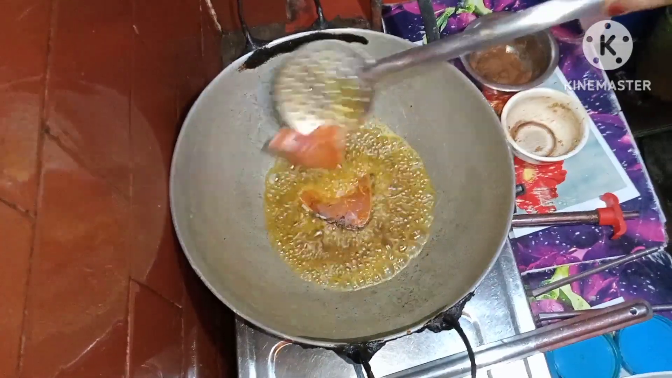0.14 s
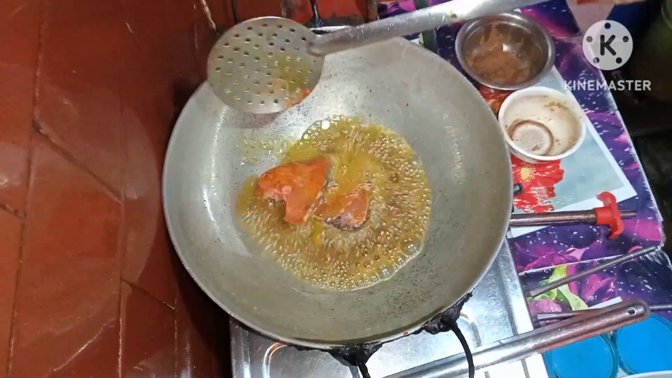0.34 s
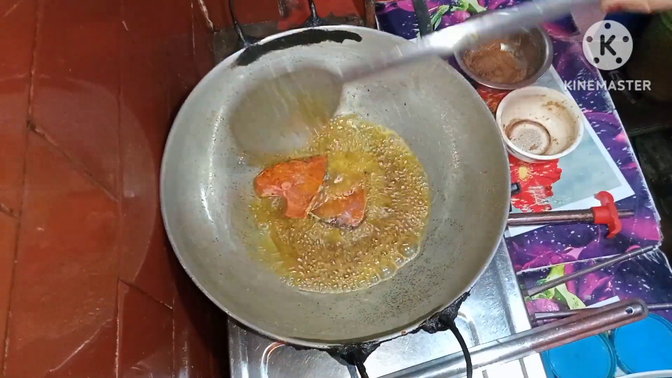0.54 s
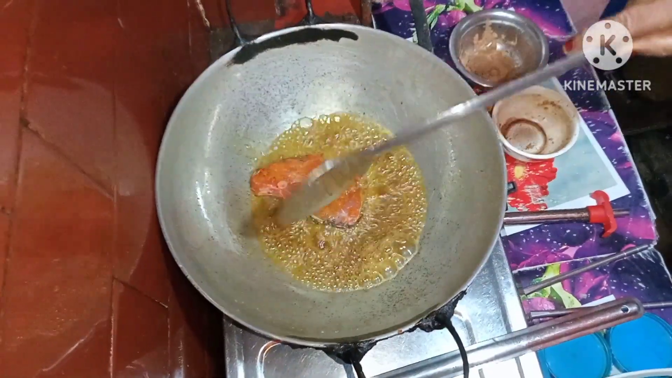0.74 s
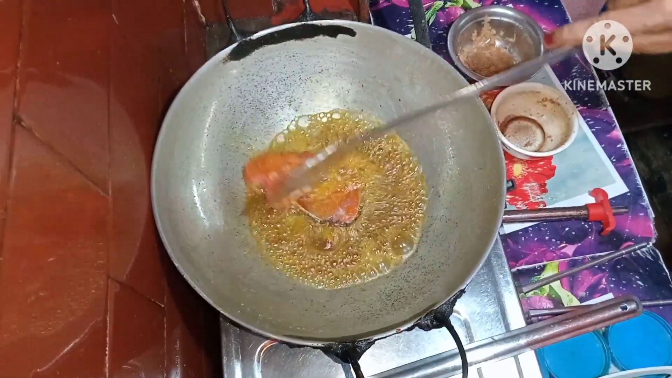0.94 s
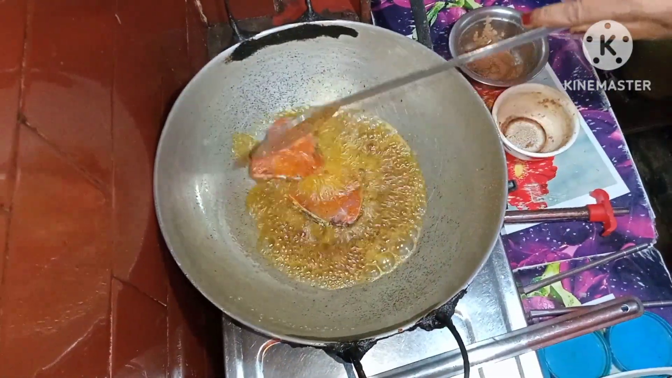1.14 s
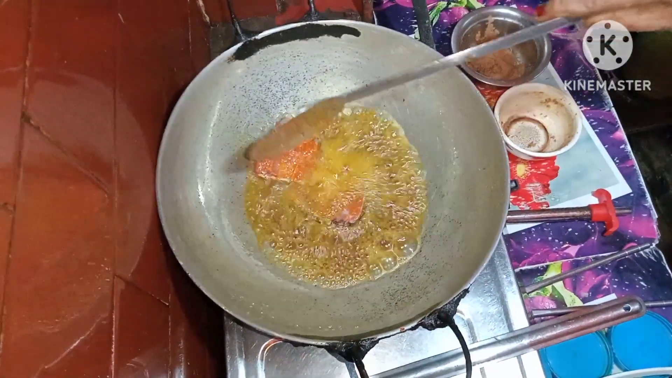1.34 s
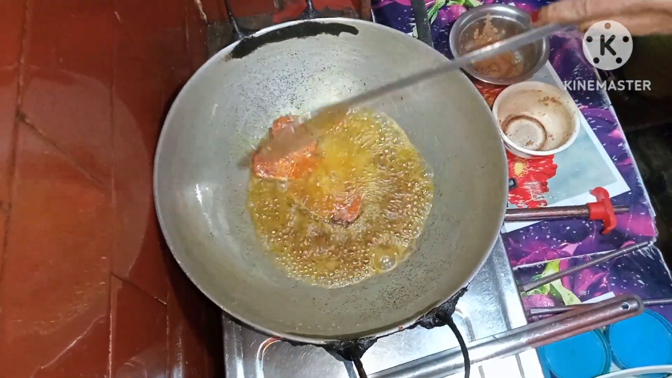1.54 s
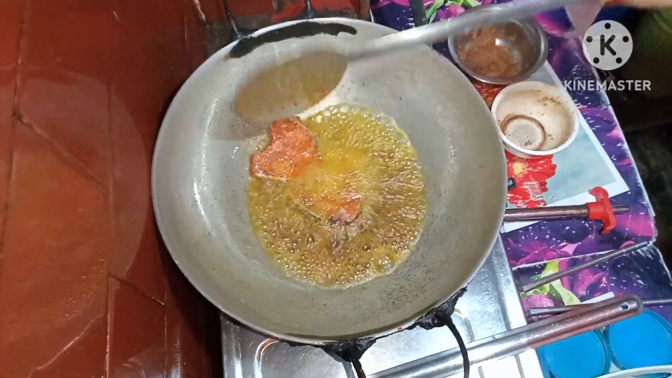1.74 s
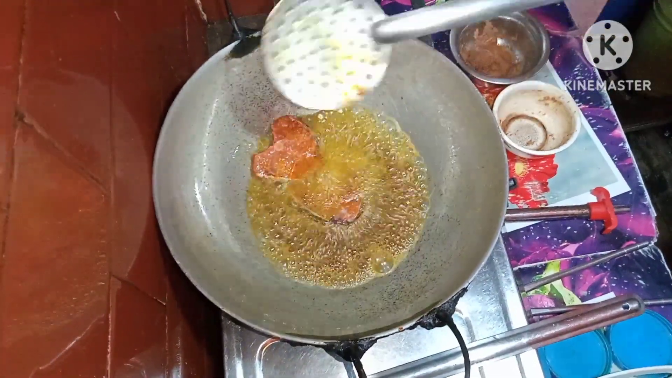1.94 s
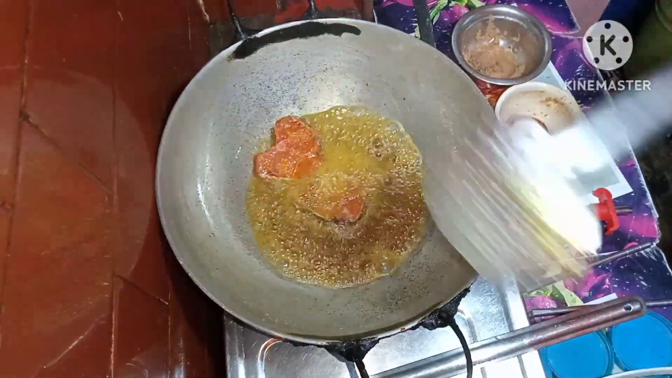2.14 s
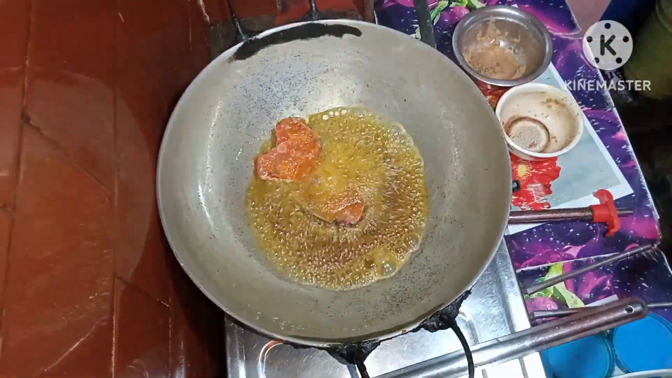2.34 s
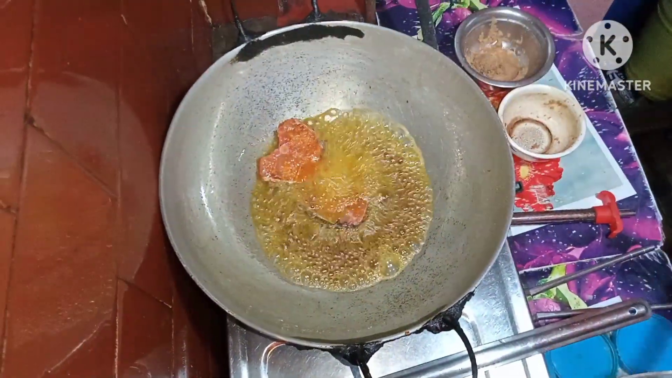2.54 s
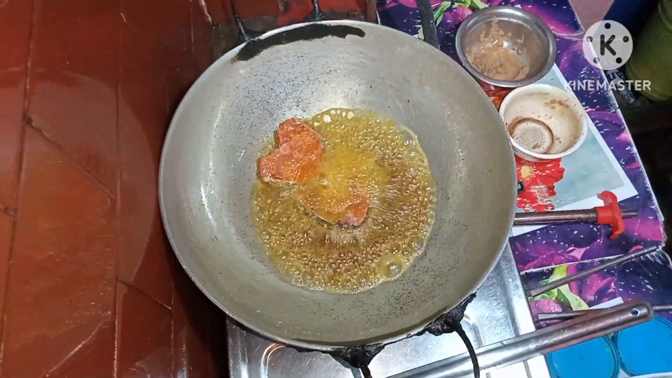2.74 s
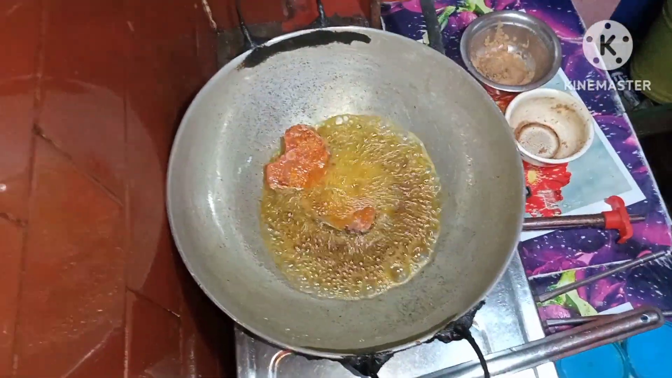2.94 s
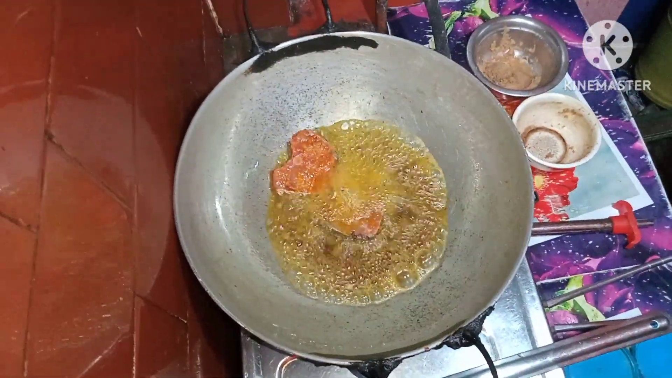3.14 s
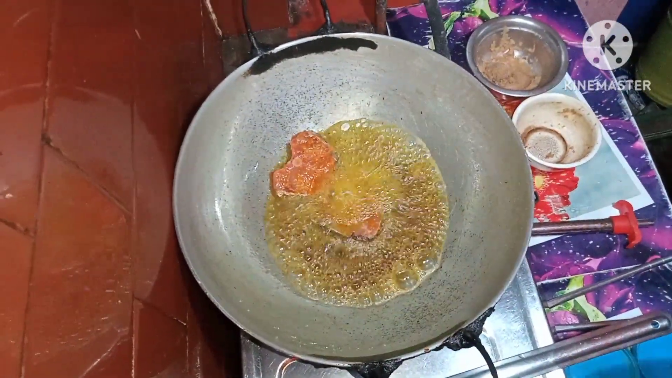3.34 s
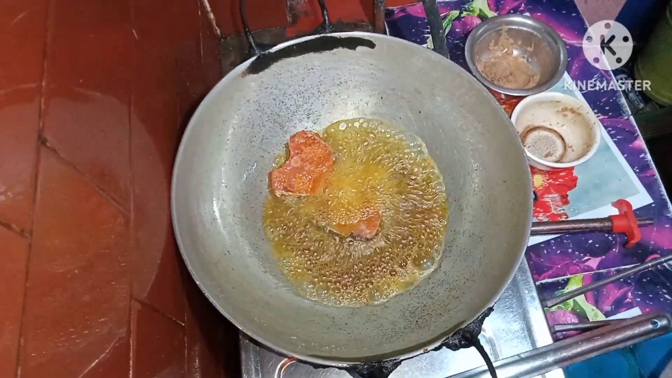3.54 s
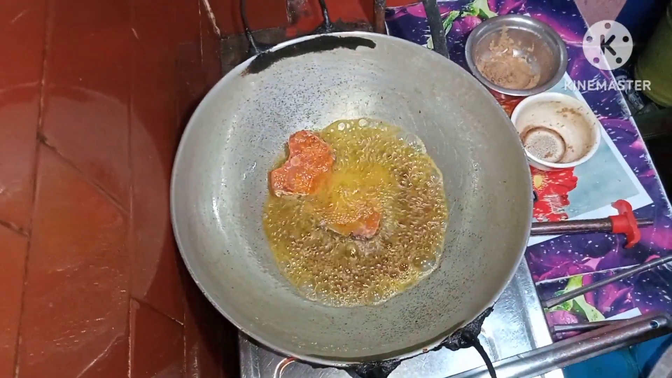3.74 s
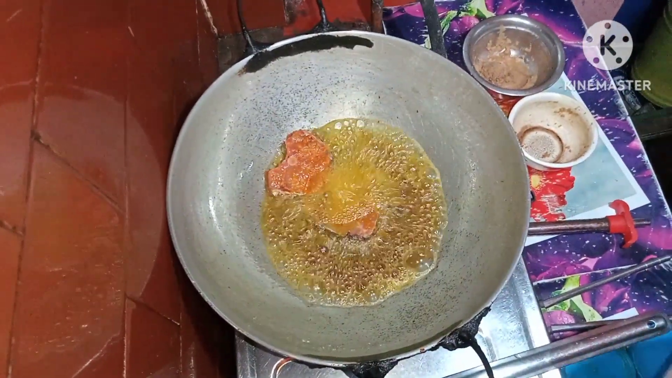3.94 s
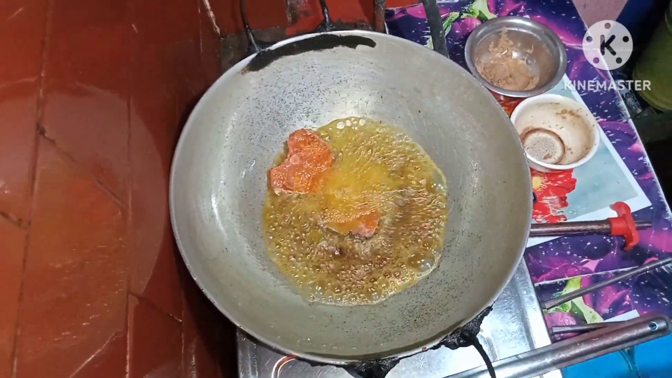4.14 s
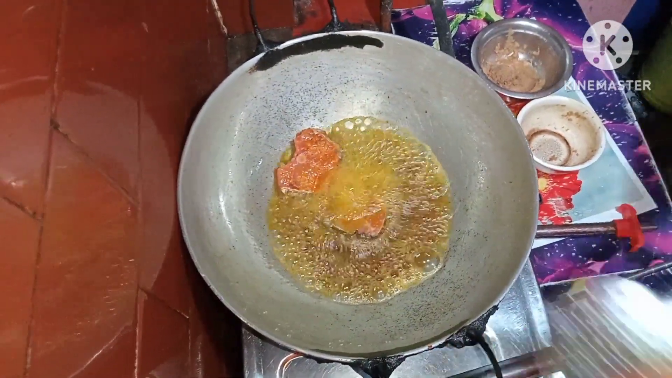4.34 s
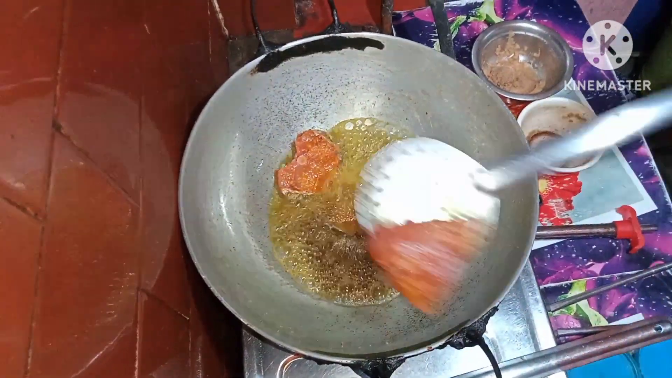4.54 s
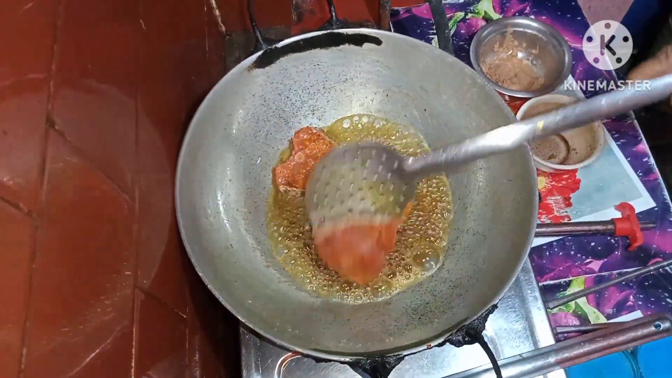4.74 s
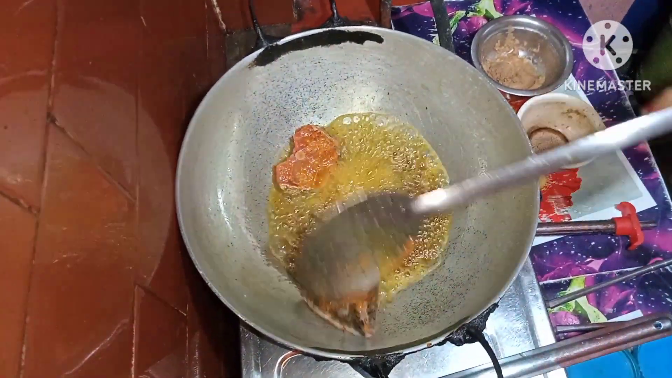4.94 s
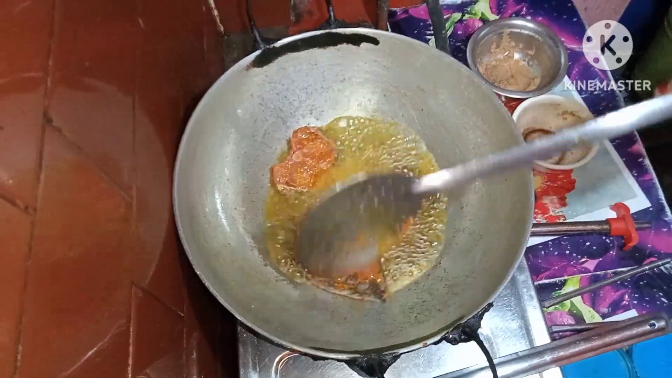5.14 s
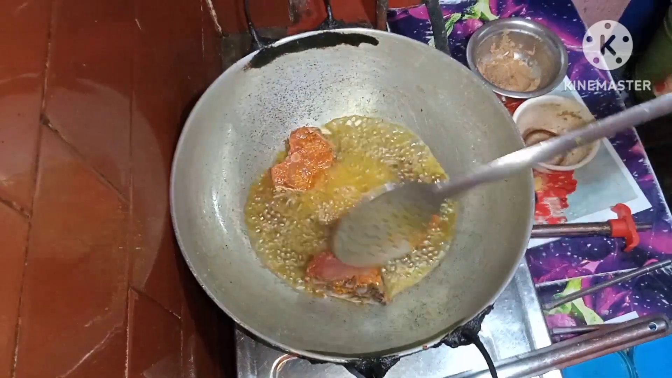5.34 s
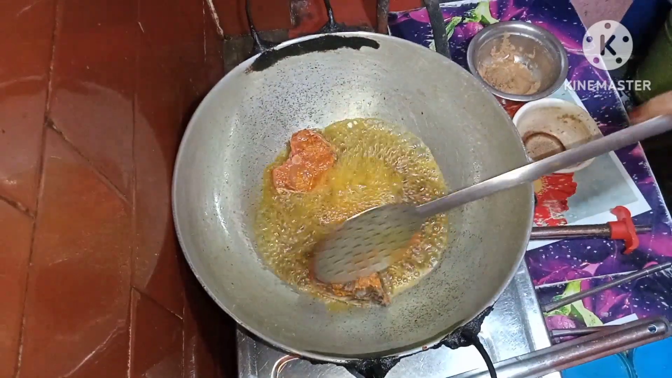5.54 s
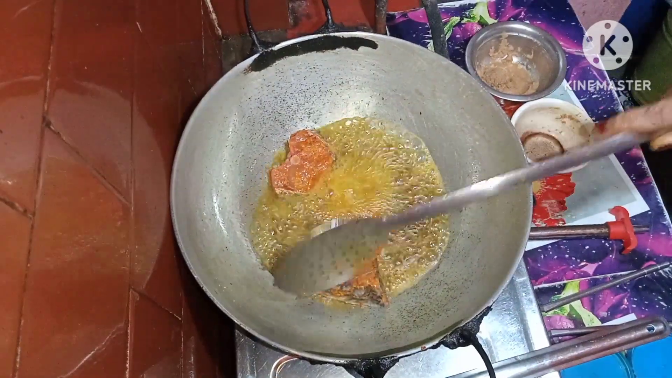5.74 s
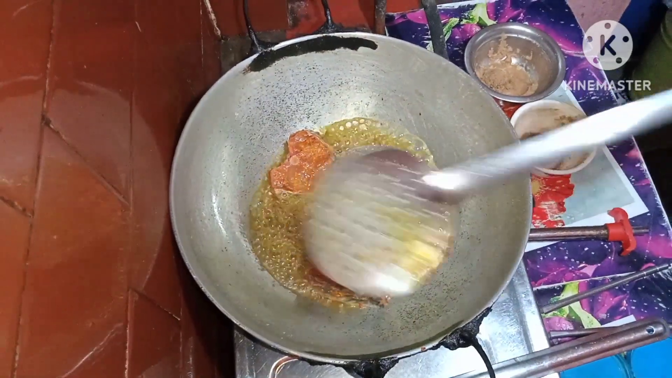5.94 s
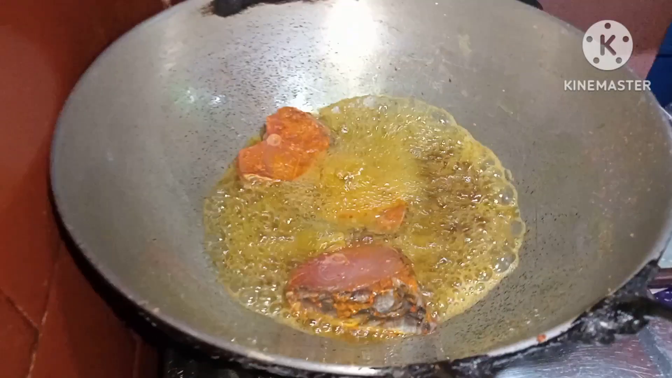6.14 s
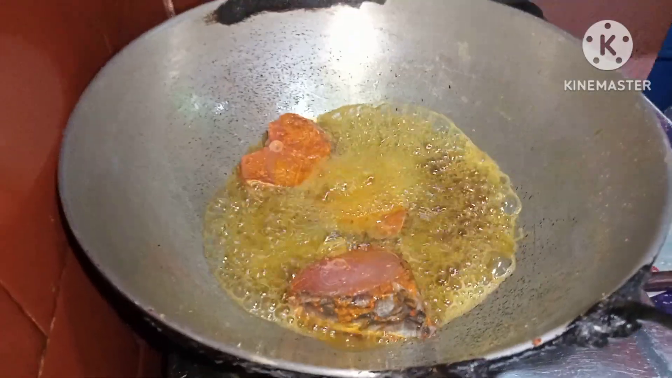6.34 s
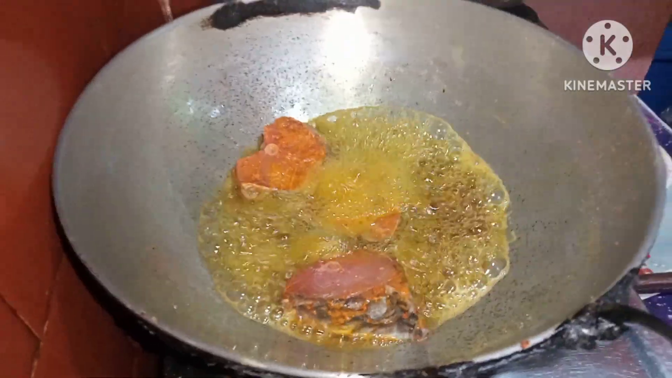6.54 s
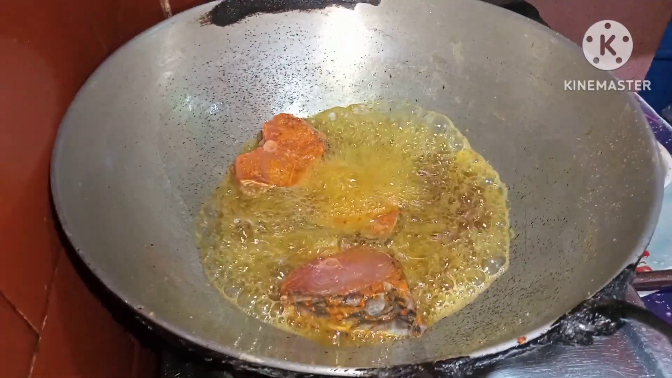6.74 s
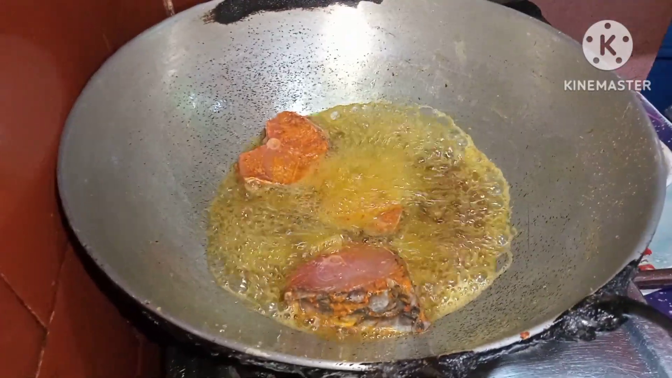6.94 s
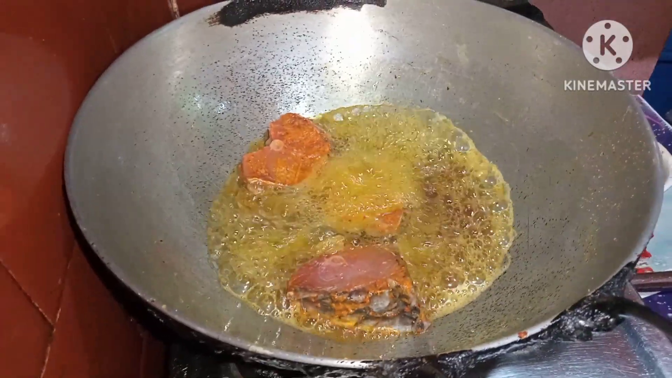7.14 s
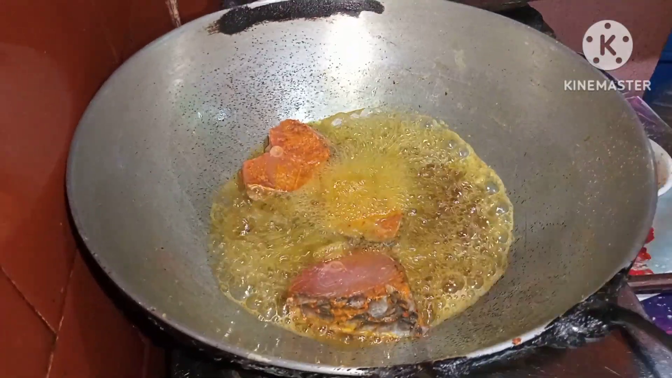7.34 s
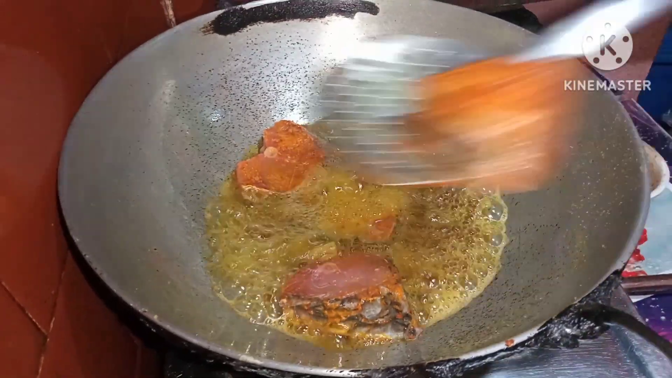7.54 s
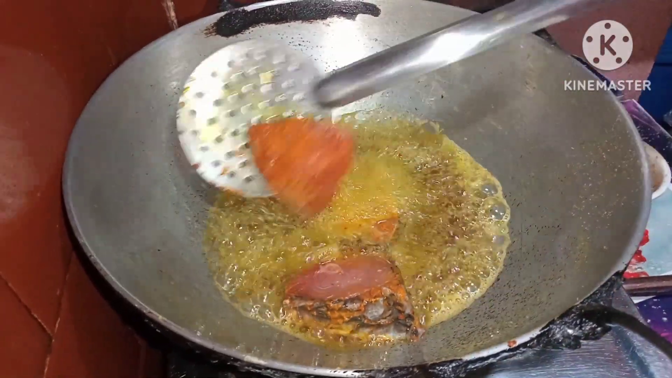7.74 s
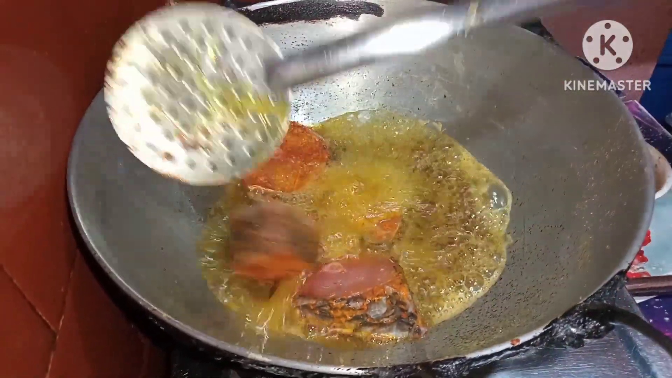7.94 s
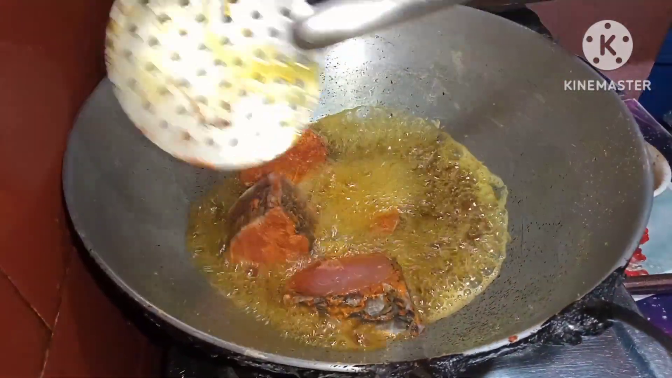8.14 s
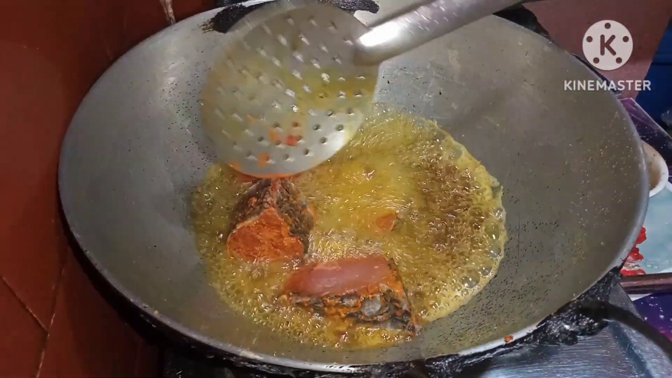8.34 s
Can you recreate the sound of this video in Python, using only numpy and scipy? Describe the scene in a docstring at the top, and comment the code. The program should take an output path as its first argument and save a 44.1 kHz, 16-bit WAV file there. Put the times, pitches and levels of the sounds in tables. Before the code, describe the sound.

Fish sizzles and pops in hot oil, surging as pieces go in, with a brief ladle scrape and one sharp click.

```python
"""A close, bright sizzle with sharp pops: fish frying in a metal wok in a small kitchen. Steam bubbles burst in
three sizes, surging as wet pieces meet the oil; water drops pop and spit, and a ladle scrapes the metal. Off to
the side the ladle knocks and scrapes in a tub as it picks up the next piece, one sharp click sounds nearby, and
a motor hums faintly. The microphone is above the wok; at about six seconds the sound crossfades to a duller
sizzle, heard from beside the rim."""
import sys
import numpy as np
from scipy import signal
from scipy.io import wavfile
from scipy.ndimage import uniform_filter1d, minimum_filter1d

SR = 44100
rng = np.random.default_rng(int(sys.argv[2]) if len(sys.argv) > 2 else 0)


def unload_audio(sound):
    """Save the sound as a 16-bit wav file, at the path given as the first command line argument."""
    columns = np.transpose(np.atleast_2d(sound))
    # keep every value between -1 and 1, then stretch to whole-number steps
    steps = np.round(np.clip(columns, -1, 1) * 32767)
    wavfile.write(sys.argv[1], SR, steps.astype(np.int16))


N = 374409
T = np.arange(N) / SR


def amp(db):
    """Decibels to gain."""
    return 10 ** (np.asarray(db) / 20)


def unit_rms(x):
    """Scales to an rms of one."""
    return x / np.sqrt(np.mean(x ** 2) + 1e-20)


def add(mix, start_s, sound):
    """Mixes a sound in at start_s."""
    part = mix[max(round(start_s * SR), 0):][:len(sound)]
    part += sound[:len(part)]


def wander(per_s):
    """A random curve of about unit size, with per_s turns a second."""
    knots = rng.standard_normal(2048)
    return np.interp(T * per_s, np.arange(len(knots)), knots)


def at_freq(points, hz):
    """Reads a table on a log-frequency axis."""
    freqs, values = np.transpose(points)
    return np.interp(np.log(hz + 1), np.log(freqs + 1), values)


def colour(x, points, size=4096):
    """Causal filter with the given spectrum, falling steeply past its last point."""
    hz = abs(np.fft.fftfreq(size, 1 / SR))
    db = at_freq(points, hz) - 60 * np.log2(np.maximum(hz / points[-1][0], 1))
    log_gain = np.log(amp(np.maximum(db, -100)))
    taps = np.fft.ifft(np.exp(np.conj(signal.hilbert(log_gain)))).real  # minimum phase
    return signal.oaconvolve(x, taps)[:len(x)]


def low_cut(x, hz):
    """Removes the bass below hz."""
    return signal.sosfilt(signal.butter(3, hz, "high", fs=SR, output="sos"), x)


def resonate(x, modes):
    """Drives resonances with x, each to its own rms level."""
    out = np.zeros(len(x))
    for hz, width_hz, db in modes:
        pole = np.exp((2j * np.pi * hz - np.pi * width_hz) / SR)
        out += amp(db) * unit_rms(signal.lfilter([1], [1, -pole], x).real)
    return out


def struck_mode(t, hz, db, t60_s):
    """One mode of a struck object: a sine that falls 60 dB in t60_s."""
    return amp(db) * np.exp(-np.log(1000) * t / t60_s) * np.sin(2 * np.pi * hz * t)


def burst(hz, cycles):
    """One bursting bubble: a ring that peaks after `cycles` turns and dies quickly."""
    turns = hz * np.arange(2048) / SR
    return turns / cycles * np.exp(1 - turns / cycles) * np.sin(2 * np.pi * turns)


def froth(noise, hz, cycles):
    """Noise rung through a bubble: a dense cluster of bursts around one pitch."""
    return unit_rms(signal.fftconvolve(noise, burst(hz, cycles))[:len(noise)])


def rim_share(midway_s=6.05, crossfade_s=0.21):
    """Crossfade between two listening places: 0 above the wok, 1 beside its rim."""
    return np.clip((T - midway_s) / crossfade_s + .5, 0, 1)


# Reverberation of the small kitchen: freq_hz, t60_s
KITCHEN_DECAY = [(150, 0.39), (700, 0.19), (2500, 0.1), (7000, 0.07), (15000, 0.14)]

def kitchen(x, wet_db):
    """Direct sound plus dense reflections from walls close to the microphone."""
    hz, t, spectrum = signal.stft(rng.standard_normal(SR // 2), SR, nperseg=256)
    decay = amp(-60 * t / at_freq(KITCHEN_DECAY, hz)[:, None])
    tail = signal.istft(spectrum * decay, SR, nperseg=256)[1]
    tail[:SR // 250] = 0  # the first reflection arrives after 4 ms
    return x + amp(wet_db) * signal.oaconvolve(x, tail / np.linalg.norm(tail))[:len(x)]


def motor_hum(mains_hz=99.93, motor_hz=98.37, in_step_s=0.41, mains_db=-73, motor_db=-64.5):
    """In the background a motor turns a little slower than the mains hum, so the two beat."""
    mains, motor = (np.sqrt(2) * np.cos(2 * np.pi * hz * (T - in_step_s)) for hz in (mains_hz, motor_hz))
    hum = amp(mains_db) * mains + amp(motor_db) * motor
    return hum * amp(1.2 * wander(13) + 2 * rim_share())  # wavers; louder at the rim


# Spectrum of the stove under the wok: freq_hz, level_db
STOVE_SPECTRUM = [(20, 7), (45, -12), (80, 18.5), (130, 16.5), (220, 6), (400, -25)]

def stove_rumble(level_db=-70):
    """The stove gives a low, steady rumble."""
    return amp(level_db) * unit_rms(colour(rng.standard_normal(N), STOVE_SPECTRUM))


# Spectrum of the ladle's scrape in the tub: freq_hz, level_db
SLIDE_SPECTRUM = [(150, -24.5), (225, -11), (265, 11), (315, -14.5), (410, 3), (540, -34), (740, 7),
                  (1080, 5), (1400, -12), (2200, -21)]

def tub_scrape(start_s=3.4, fastest_s=3.64, end_s=3.8, level_db=-35.5, ends_db=-16, judder_db=4.5):
    """The ladle is pushed through the tub with a juddering scrape that swells and stops."""
    swell_db = np.interp(T, [start_s, fastest_s, end_s], [ends_db, 0, ends_db])
    gain = amp(level_db + swell_db) * (T > start_s) * (T < end_s)
    friction = rng.standard_normal(N) * amp(judder_db * wander(90))
    return gain * unit_rms(colour(friction, SLIDE_SPECTRUM))


# Dull knocks of the ladle in the tub: start_s, level_db, pitch_hz
KNOCKS = [(2.48, -14, 731), (2.607, -10, 880), (2.643, -16.5, 880), (2.799, -16.5, 770), (2.86, -20, 725),
          (2.885, -17.5, 756), (2.898, -22, 733), (3.579, -21, 1170), (3.714, -25, 1010)]
# Dull, hollow ring of the knocks: pitch_hz, level_db, t60_s
KNOCK_MODES = [(236, -18.5, 0.066), (396, -17.5, 0.077), (750, -12.5, 0.078), (1036, -9, 0.075),
               (1262, -10.5, 0.073)]

def knocks(t60_s=0.046, bounce_s=0.0098, bounce_db=-6, attack_s=0.0059, contacts=3):
    """The ladle knocks in the tub and chatters to rest, each contact ringing differently."""
    out, t = np.zeros(N), np.arange(SR // 4) / SR
    soft_attack = 1 - np.exp(-t / attack_s)
    for start_s, level_db, pitch_hz in KNOCKS:
        modes = KNOCK_MODES + [(pitch_hz, 0, t60_s)]
        for bounce in range(contacts):
            ring = sum(struck_mode(t, hz * rng.uniform(0.94, 1.05), db, t60) for hz, db, t60 in modes)
            add(out, start_s, amp(level_db + bounce * bounce_db) * ring * soft_attack)
            start_s += bounce_s * rng.uniform(0.633, 1.4)
    return amp(-0.5) * kitchen(low_cut(out, 170), wet_db=-15)


# Hollow ring of the nearby click: pitch_hz, level_db, t60_s
CLICK_MODES = [(290, -20, 0.11), (413, -12, 0.067), (566, 1, 0.11), (900, -7, 0.13), (1260, -5.5, 0.19),
               (1810, -7, .16), (1816, 5, 0.074), (2030, -4, 0.13), (2450, -8, 0.081), (3200, -18, 0.14)]
# Spectrum of its rattle: freq_hz, level_db
RATTLE_SPECTRUM = [(50, -25), (150, -23), (300, -2.5), (1200, 1), (2100, -0.5), (3500, -2), (4300, -17)]

def click(start_s=6.6816, contact_s=.0062, ring_db=-18.5, tail_db=-2.5, rattle_db=-21, rattle_s=0.045):
    """Close to the microphone: a few milliseconds of hard contact, then a short ring and rattle."""
    out, t = np.zeros(N), np.arange(SR // 4) / SR
    contact = np.exp(-(t / contact_s) ** 4)
    ring = sum((-1) ** k * struck_mode(t, *mode) for k, mode in enumerate(CLICK_MODES))
    rattle = unit_rms(colour(rng.standard_normal(len(t)), RATTLE_SPECTRUM)) * np.exp(-t / rattle_s)
    add(out, start_s, (amp(ring_db) * ring + amp(rattle_db) * rattle) * (contact + amp(tail_db)))
    return kitchen(low_cut(out, 125), wet_db=-17)


# Loudness curve of the ladle on the wok's bottom: time_s, level_db
LADLE_STROKE = [(4.95, -42), (5.02, -28), (5.1, -51), (5.28, -29), (5.37, -36), (5.63, -31.5), (5.66, -33),
                (5.71, -33.5), (5.78, -67)]
# Ring of the ladle's bowl: pitch_hz, width_hz, level_db
LADLE_MODES = [(1307, 24, -13), (1626, 116, -5.5), (2630, 760, -6.5)]

def ladle(judder_db=2.5):
    """Below the microphone the ladle sticks and slips on the wok while it eases a piece off."""
    friction = rng.standard_normal(N) * amp(judder_db * wander(70))
    stroke = amp(np.interp(T, *np.transpose(LADLE_STROKE)))
    return stroke * low_cut(resonate(friction, LADLE_MODES), 620)


# Hollow resonances of the wok over the stove: pitch_hz, width_hz, level_db
WOK_MODES = [(273.7, 7.7, -73), (422, 50, -62.5), (548, 180, -61), (889.6, 27, -49.5), (1110, 260, -49)]

def wok_ring(rim_db=-2.5):
    """The simmering keeps the wok ringing, a little weaker from beside the rim."""
    return resonate(rng.standard_normal(N), WOK_MODES) * amp(rim_db * rim_share())


# Narrow ringing peaks that colour the sizzle at the microphone: pitch_hz, width_hz, relative_db
SIZZLE_PEAKS = [(1955, 56, -6.5), (2248, 46, -11), (2557, 120, -7), (5800, 340, -6.5)]

def echo_and_peaks(x, echo_s=0.000963, echo_db=-17):
    """The wok's steep wall returns one quick echo, and narrow peaks ring at the microphone."""
    out = x.copy()
    add(out, echo_s, amp(echo_db) * x)
    for hz, width_hz, db in SIZZLE_PEAKS:
        b, a = signal.iirpeak(hz, hz / width_hz, fs=SR)
        out += amp(db) * signal.lfilter(b, a, x)
    return out


# Wet specks in the wok: start_s, level_db, pitch_hz
FIZZES = [(0.834, -23.5, 5350), (1.242, -22, 5740), (2.675, -32, 13000), (3.155, -30, 13000),
          (3.886, -29.5, 12600), (4.94, -34, 12500), (5.222, -24, 5170), (6.253, -24.5, 5300),
          (6.375, -26, 5160), (6.926, -30.5, 4900), (7.126, -24, 4870), (7.386, -29, 5560),
          (8.159, -28, 5830)]

def fizzes(swell_s=0.011, sputter_db=3):
    """A wet speck boils away in a soft cluster of tiny bursts that swells and dies."""
    out, t = np.zeros(N), np.arange(SR // 8) / SR
    swell = t / swell_s * np.exp(1 - t / swell_s)
    for start_s, level_db, pitch_hz in FIZZES:
        sputter = rng.standard_normal(len(t)) * amp(sputter_db * wander(250)[:len(t)])
        add(out, start_s, amp(level_db) * froth(sputter, pitch_hz, cycles=1.12) * swell)
    return low_cut(out, 2800)


# Droplets on the bare metal: start_s, level_db, pitch_hz
SPITS = [(0.036, -18, 5460), (0.0525, -18, 4330), (0.0636, -8.5, 5230), (1.2012, -13, 5330),
         (1.3533, -16, 5900), (4.2215, -17, 6100), (4.3722, -13.5, 5800), (4.668, -17, 4200),
         (5.493, -14, 5860), (6.265, -22, 5170), (7.868, -13, 4270)]

def spits(crack_s=0.0013, tail_db=-11, tail_s=0.013):
    """A droplet snaps on hot metal: a bright crack and a brief fizz."""
    out, t = np.zeros(N), np.arange(2048) / SR
    decay = np.exp(-t / crack_s) + amp(tail_db) * np.exp(-t / tail_s)
    for start_s, level_db, pitch_hz in SPITS:
        fizz = froth(rng.standard_normal(len(t)), pitch_hz, cycles=1.0)
        add(out, start_s, amp(level_db) * fizz * decay)
    return amp(-3.5) * low_cut(out, 1400)


# Wet fish meets the oil as a piece is slid in or turned:
# start_s, hold_s, release_s, level_db, extra_spray_db, extra_steam_db, extra_large_db
SURGES = [(0.227, 0.36, 0.36, -30.5, 0, -10, 0.5), (0.944, 0.46, 0.77, -30.5, 1.5, -4, -1),
          (1.026, 0.034, 0.071, -29, 6.5, -15, 2.5), (4.902, .75, 0.12, -31, -0.5, -8, -6),
          (5.09, 0.052, 0.092, -28.5, 6, 2, -17), (5.152, 0.021, .075, -26, 4, -6, -0.5),
          (7.853, .6, .5, -33, -3, 0.5, -0.5)]

def surge_power(layer=None, rise_s=0.025):
    """Boiling set off by wet fish rises, holds and dies away; a named layer adds its extra level."""
    power = np.zeros(N)
    for start_s, hold_s, release_s, level_db, spray_db, steam_db, large_db in SURGES:
        extra_db = {None: 0, "spray": spray_db, "steam": steam_db, "large": large_db}[layer]
        rise = np.clip((T - start_s) / rise_s, 0, 1)
        release = np.exp(-np.maximum(T - start_s - rise_s - hold_s, 0) / release_s)
        power += (amp(level_db + extra_db) * rise * release) ** 2
    return power


# Boil of each bubble size: start_db, drying_db_per_s, surge_db, rim_db
LARGE_BOIL = (-29.5, -0.6946, -0.2, 1.56)
SMALL_BOIL = (-29.5, -.5, 0, -0.7)
SPRAY_BOIL = (-36.5, -0.35, -2, -5)

def boil(settings, layer=None):
    """Gain of one bubble size: a steady boil that fades as the fish dries, plus the surges."""
    start_db, drying_db_per_s, surge_db, rim_db = settings
    steady = amp(start_db + drying_db_per_s * T) ** 2
    surging = amp(surge_db) ** 2 * surge_power(layer)
    return np.sqrt(steady + surging) * amp(rim_db * rim_share())


# Spectrum of the steam around a wet piece: freq_hz, level_db
STEAM_SPECTRUM = [(1900, -33.5), (2550, -10), (2780, 2.5), (2890, 0), (3020, 9.5), (3170, -13), (3300, 6),
                  (3550, 1.5), (4200, -15)]

def steam(sputter_db=4):
    """A wet piece meets the oil and sheds a rush of like-sized bubbles: a narrow, sputtering hiss."""
    rush = rng.standard_normal(N) * amp(sputter_db * wander(120))
    return np.sqrt(surge_power("steam")) * unit_rms(colour(rush, STEAM_SPECTRUM))


def stray_drops(per_s=0.8, level_db=-23, spread_db=2, pitch_hz=2700, octaves=0.18, cycles=3, snap_db=-8):
    """Rows for faint drops that burst by chance, more often while the oil surges."""
    activity = np.cumsum(boil(LARGE_BOIL))
    times = np.interp(rng.random(64), activity / activity[-1], T)
    scatter = rng.standard_normal((len(times), 2))
    drops = [(start_s, level_db + spread_db * louder, pitch_hz * 2 ** (octaves * higher), cycles, snap_db)
             for start_s, (louder, higher) in zip(times, scatter)]
    return drops[:int(per_s * N / SR)]


# The loudest water drops in the oil: start_s, level_db, pitch_hz, rise_cycles, snap_db (against the plop)
LOUD_DROPS = [(0.0651, -12, 2560, 2, 0), (0.1581, -10, 3220, 2.6, -4), (0.1706, -8, 2960, 1, -4),
              (0.2729, -5, 2830, 3.5, -10), (0.3584, -18, 2700, 3.5, -5), (0.6317, -15, 2720, 1.7, -5),
              (0.805, -16, 3330, 2.7, 7), (0.9934, -6, 3240, 0.7, -12), (1.0962, -9, 1650, 2.7, 4),
              (1.1199, -9, 2750, 2.1, -4), (1.2683, -10.5, 2030, 3.7, 8), (1.3424, -1, 2420, 2.9, -12),
              (1.4927, -15, 2160, 2.4, 1), (1.5333, -13, 2700, 2.3, -7), (1.7417, -13, 2620, 2.1, -16),
              (1.9232, -11, 2560, 4.2, -3), (1.9646, -5, 2800, 0.98, -9.5), (2.0949, -11.5, 2500, 3.1, -7),
              (2.269, -16.5, 1550, 4.2, -4), (2.4077, -5, 2570, 2.8, -37), (2.5259, -9.5, 2560, 2.4, -11),
              (2.7886, -9, 3100, 0.99, -4), (3.1763, -16, 2260, 3.5, -1), (3.5524, -16, 2670, 1.5, -7),
              (3.606, -13, 2670, 4.4, 3.5), (3.9548, -10.5, 1980, 2.8, -6), (4.2141, -9.5, 3050, 3.9, -14),
              (4.3389, -20, 2900, 2.8, 4), (4.5099, -16.5, 3120, 3.5, 2), (4.6665, -15, 3420, 3.8, -2.5),
              (5.6545, -10, 2580, 3.3, 1), (6.2948, -13, 3370, 3.4, -15), (6.8428, -15.5, 3420, 3.8, -4),
              (7.0432, -13, 2320, 0.88, 0), (7.0451, -10, 2080, 1.8, -7), (7.6188, -12, 2970, 2.2, -7),
              (7.7685, -22, 2710, 3.1, 3), (7.7936, -16, 3140, 3.7, -6), (7.8705, -18, 2900, 3.1, -1),
              (8.0564, -14, 3300, 3.5, -14), (8.4031, -10.5, 3030, 3.1, -9)]

def pops(snap_s=0.0051, snap_hz=2700, echo_s=.0032, echo_db=-9, ring_s=0.013, ring_db=-14):
    """A drop flashes to steam: a snap, a round plop, an echo off the wok's far wall and a short ring."""
    out, t = np.zeros(N), np.arange(2048) / SR
    for start_s, level_db, pitch_hz, rise_cycles, snap_db in LOUD_DROPS + stray_drops():
        swing = pitch_hz * t / rise_cycles
        plop = (swing * np.exp(1 - swing)) ** 2 * np.sin(2 * np.pi * pitch_hz * t)
        snap = froth(rng.standard_normal(len(t)), snap_hz, cycles=0.64) / 2 * np.exp(-t / snap_s)
        ring = froth(rng.standard_normal(len(t)), pitch_hz, cycles=2.5) / 2 * np.exp(-t / ring_s)
        add(out, start_s, amp(level_db) * (plop + amp(snap_db) * snap))
        return_s = start_s + echo_s * rng.uniform(0.782, 1.114)
        add(out, return_s, amp(level_db) * (amp(echo_db) * plop + amp(ring_db) * ring))
    return amp(-1.0) * kitchen(low_cut(out, 900), wet_db=-7.5)


def bubbles(low_hz, high_hz, per_s, cycles, clump_db, swell_db, swells_per_s, tail_db, tail_s, foam_db,
            bands=14, spread_db=5.0):
    """Bubbles of many pitches burst at random; neighbours go off in clumps and the whole swarm swells."""
    out, decay = np.zeros(N), np.exp(-1 / (tail_s * SR))
    count = int(per_s * N / SR / bands)
    for hz in np.geomspace(low_hz, high_hz, bands):
        when, size = rng.random((2, 8000))[:, :count]
        size_db = spread_db * np.minimum(-np.log(size), 3.7)
        kicks = amp(size_db) * (-1) ** np.arange(count)
        train = unit_rms(np.bincount((when * N).astype(int), kicks, N))
        # each burst scatters around the bowl and dies away over the even wash of the foam
        tail_power = amp(tail_db) ** 2 * signal.lfilter([1 - decay], [1, -decay], train ** 2)
        wash = np.sqrt(tail_power + amp(foam_db) ** 2) * rng.standard_normal(N)
        drive = (train + wash) * amp(clump_db * wander(55))
        out += np.sqrt(hz) * unit_rms(signal.oaconvolve(drive, burst(hz, cycles))[:N])
    return kitchen(out * amp(swell_db * wander(swells_per_s)), wet_db=-11.0)


def at_mic(x, above_spectrum, rim_spectrum):
    """The wok's wall shades the sound differently above and beside the rim; the two colours crossfade."""
    from_above = unit_rms(colour(x, above_spectrum))
    from_rim = unit_rms(colour(x, rim_spectrum))
    return np.sqrt(1 - rim_share()) * from_above + np.sqrt(rim_share()) * from_rim


# Colour of each bubble size, microphone above the wok or beside the rim: freq_hz, level_db
LARGE_ABOVE = [(76, -80), (130, -71), (319, -26), (410, -20), (527, -26.5), (697, -9.5), (773, -17),
               (883, -10.5), (979, -17), (1070, -6.5), (1420, -8.5), (1700, -7), (1840, -7), (1990, -6),
               (2370, -2), (2550, 0), (3750, -5), (4300, -11), (5720, -19), (9680, -120)]
LARGE_RIM = [(76, -21), (130, -28), (241, -39), (370, -17), (442, -8.5), (667, -7), (718, -8), (870, -3),
             (1020, -14), (1260, -7), (1690, -2.5), (1840, -4.5), (2480, -4), (2960, 0.5), (3500, 1.5),
             (4300, -4.5), (5720, -52), (9680, -120)]
SMALL_ABOVE = [(2470, -34), (4200, -40), (4370, -12), (4980, -2.5), (5950, 0), (6480, -1.5), (7480, -12.5),
               (9200, -16), (12000, -30), (20200, -120)]
SMALL_RIM = [(2470, -32), (4200, -32), (4450, -7), (4950, -0.5), (5300, -0.5), (5620, -5), (6050, -7),
             (6630, -11), (7580, -20), (9200, -22), (12000, -66), (20200, -120)]
SPRAY_ABOVE = [(5180, -6), (8000, -4), (9000, -8.5), (10700, -8), (11500, -2), (12100, -2.5), (12700, -1.5),
               (13050, -3), (13550, 2), (14200, -4.5), (15450, -1)]
SPRAY_RIM = [(5180, 7), (8000, -2), (9900, -8.5), (10800, -7.5), (11400, 0.5), (12200, -1.5), (12900, -2.5),
             (13450, -2), (14200, -3), (15450, -6)]

def frying(gust_db=1.0, flurry_db=0.4):
    """Close up, large bubbles crackle, small ones sizzle, and fine spray hisses on the hot metal."""
    large = bubbles(223.0, 4500, per_s=3600, cycles=1.0, clump_db=1.3, swell_db=1.9, swells_per_s=35,
                    tail_db=4.5, tail_s=0.0077, foam_db=1, bands=20)
    small = bubbles(3760, 8670, per_s=2800, cycles=1.0, clump_db=1.5, swell_db=1.2, swells_per_s=95,
                    tail_db=-2.5, tail_s=0.0018, foam_db=-1.0)
    spray = bubbles(9100, 13640, per_s=1100, cycles=1.4, clump_db=1.5, swell_db=1.0, swells_per_s=95,
                    tail_db=0.5, tail_s=0.0092, foam_db=0.5)
    crackle = boil(LARGE_BOIL, "large") * at_mic(large, LARGE_ABOVE, LARGE_RIM)
    sizzle = boil(SMALL_BOIL) * at_mic(small, SMALL_ABOVE, SMALL_RIM)
    hiss = boil(SPRAY_BOIL, "spray") * at_mic(spray, SPRAY_ABOVE, SPRAY_RIM)
    # quick gusts of steam and slower flurries lift all sizes at once
    return (crackle + sizzle + hiss) * amp(gust_db * wander(80) + flurry_db * wander(9.2))


def scene():
    """The wok heard close up in mono, with the sounds of the kitchen around it."""
    wok = echo_and_peaks(frying() + steam() + pops() + spits() + fizzes()) + wok_ring() + ladle()
    return (wok + knocks() + tub_scrape() + click() + motor_hum() + stove_rumble())[None]


def record(dry):
    """After the microphone, a fast limiter holds the sharpest pops down and a low-pass trims the top."""
    ceiling, window, cutoff_hz = .57, 89, 15500  # the window spans 2 ms
    allowed_gain = ceiling / np.maximum(abs(dry), ceiling)
    limited = dry * uniform_filter1d(minimum_filter1d(allowed_gain, size=window), size=window)
    low_pass = signal.firwin(511, cutoff_hz, window=("kaiser", 9), fs=SR)
    return signal.oaconvolve(limited, low_pass[None], "same")


dry = scene()
out = record(dry)
unload_audio(out)
```